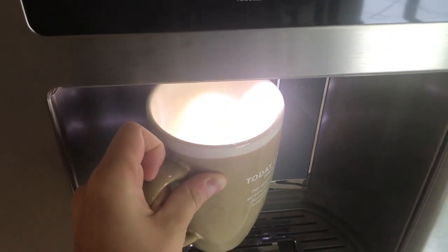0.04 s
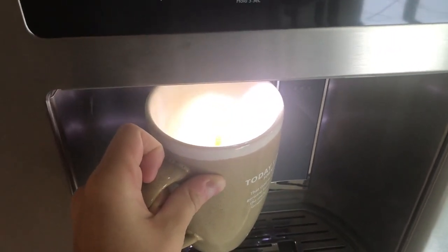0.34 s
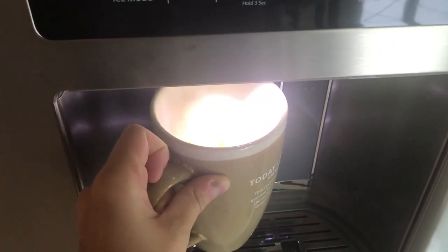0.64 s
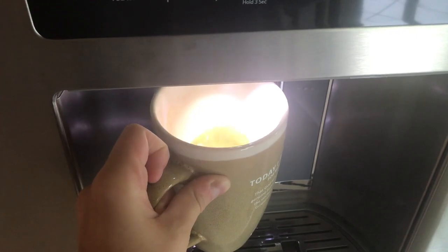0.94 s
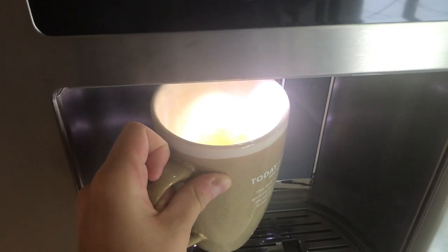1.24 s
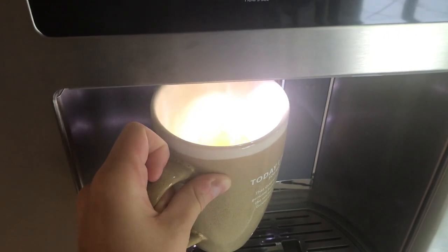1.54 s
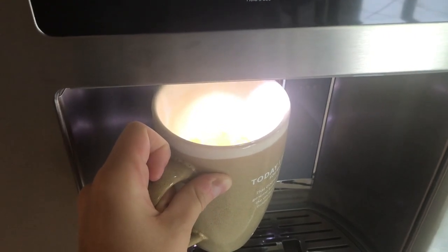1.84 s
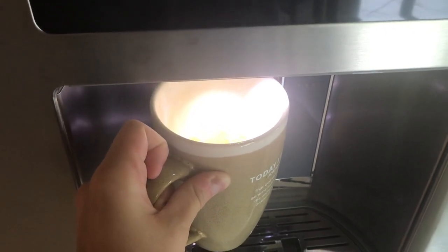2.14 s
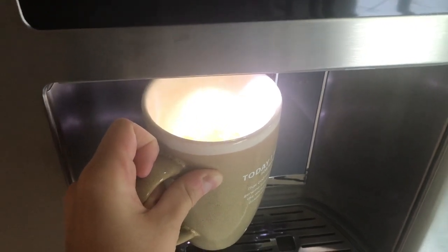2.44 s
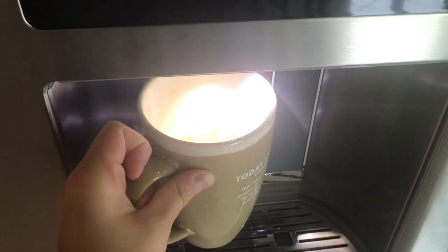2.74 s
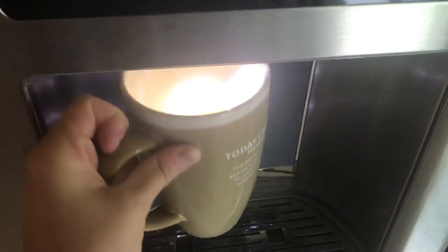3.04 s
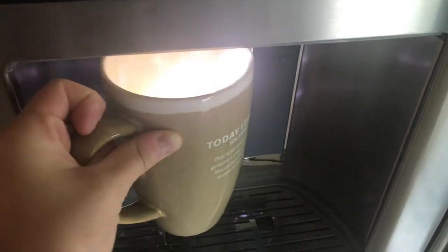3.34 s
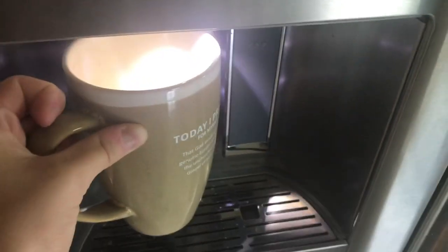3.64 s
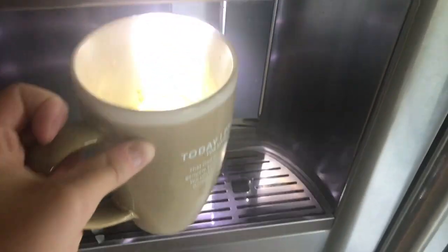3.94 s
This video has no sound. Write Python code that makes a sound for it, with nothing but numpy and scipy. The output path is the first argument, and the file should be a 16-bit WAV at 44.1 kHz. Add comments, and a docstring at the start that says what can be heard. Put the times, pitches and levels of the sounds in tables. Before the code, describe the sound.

Ice cracks and clatters in uneven bursts as a fridge dispenser crushes it over a humming, grinding motor. The motor then stops and the last chips clink into a ceramic mug, heard close by in a quiet kitchen.

```python
"""Ice crunches and clatters over a humming motor: a fridge dispenser fills a mug, close by in a kitchen.
The geared motor churns the ice bin. Cubes crack between the blades and jolt the housing,
and the chips rattle down a plastic chute that adds its own hollow tones.
After three seconds the motor runs down and the last chips tick into the mug; a few make it ring."""
import sys
import numpy as np
from scipy import signal
from scipy.fft import rfft, irfft
from scipy.io import wavfile
from scipy.ndimage import uniform_filter1d

SR = 44100
rng = np.random.default_rng(int(sys.argv[2]) if len(sys.argv) > 2 else 0)


def to_wav(s):
    """Save 16-bit WAV."""
    ch = np.atleast_2d(s).T  # columns
    pcm = np.round(np.clip(ch, -1, 1) * 32767)  # PCM
    wavfile.write(sys.argv[1], SR, pcm.astype(np.int16))


N = 176400
T = np.arange(N) / SR
RING_T = T[:SR // 8]

# tone of the quiet kitchen: f/Hz, relative level/dB
KITCHEN_COLOUR = [(30, -19), (70, 1), (160, -6.5), (260, 2), (450, -8.5), (1000, -16.5), (3000, -25),
                  (15000, -34)]
# how the motor's speed changes under load: t/s, share of normal speed
MOTOR_SPEED = [(0, .992), (.2, 1), (.5, .99), (.85, .975), (1.1, .996), (1.55, 1.014), (2.2, .993),
               (2.35, 1.005), (2.9, 1.008)]
# tones of the motor and gears at normal speed: f/Hz, level/dB
GEAR_TONES = [(102, -59), (240, -52), (274, -52), (298, -49), (330, -47), (360, -44.5), (2519, -49.5)]
# tone of the feed screw churning the ice bin: f/Hz, relative level/dB
CHURN_COLOUR = [(30, -37), (65, -14), (140, -5), (260, -2.5), (370, -1.5), (510, -10.5), (700, -8),
                (830, -12.5), (1050, -4), (1470, -20), (1700, -8), (2080, -11.5), (2330, -22), (2580, -10),
                (2900, -22), (3300, -18), (4500, -30), (6500, -23.5), (8000, -31.5), (15000, -32.5)]
# notes the housing rings at: f/Hz, relative level/dB, t60/s (the time to fade by 60 dB)
HOUSING_MODES = [(148, 1.5, 0.15), (334, 17.5, 0.04), (370, 21.5, 0.047), (410, 13, 0.059)]
# a blade bites a whole cube and jolts the housing: t/s, length/s, level/dB
JOLTS = [(0.548, 0.035, -22.5), (0.879, 0.02, -29.5), (1.347, 0.019, -33), (1.754, 0.031, -33.5),
         (2.512, 0.022, -28.5), (2.601, 0.018, -25.5), (3.019, 0.016, -35), (3.15, 0.018, -37),
         (3.316, 0.0074, -49)]
# notes the mug rings at: f/Hz, relative level/dB, t60/s
MUG_MODES = [(1080, -5, .09), (4231, -8, .14), (5771, -6, .14), (6121, -7, .13), (9623, -8, .12),
             (11320, -4, .12), (12557, -9, .14)]
# a chip hits the wall of the mug: t/s, level/dB
CLINKS = [(3.356, -59), (3.512, -39.5), (3.583, -48)]
# pitches the plastic chute brings out: f/Hz, width/Hz, level/dB relative to the plain sound
CHUTE_RESONANCES = [(971, 53, -2.5), (1126, 16, -8.5), (1790, 35, -2), (2097, 62, 5.5), (2457, 100, -1),
                    (3440, 88, -0.5), (4215, 180, -5), (5350, 98, -10.5), (6010, 170, -3)]
# larger pieces of ice that ring with a clear pitch: t/s, f/Hz, level/dB
PINGS = [(.0999, 2410, -18), (0.66, 950, -16), (0.883, 2080, -15), (1.001, 760, -19.5),
         (1.617, 5300, -16.5), (1.764, 4070, -16), (1.809, 2114, -16.5), (1.825, 970, -18),
         (1.929, 710, -14), (1.978, 1790, -20.5), (2.014, 1040, -17), (2.438, 2090, -18), (2.706, 940, -19),
         (2.839, 3950, -25.5), (3.015, 745, -14), (3.318, 1070, -33)]
# how the stream of fine crumbs swells and fades: t/s, level/dB before the chute
CRUMB_FLOW = [(0, -31), (.2, -57), (.46, -44), (.54, -35), (.68, -28), (.86, -31), (.93, -35.5), (1.1, -45),
              (1.33, -51), (1.48, -49), (1.68, -35.5), (1.92, -38.5), (2.32, -56.5), (2.55, -41.5),
              (2.8, -33), (2.93, -51), (3.45, -51), (3.7, -76.5)]
# tone of the crumbs: f/Hz, relative level/dB
CRUMB_COLOUR = [(50, -37.5), (300, -10.5), (700, -0.5), (1100, -5), (2200, -3.5), (4000, -5.5),
                (6300, -7.5), (7800, -8), (10500, -13.5), (15500, -8)]
# the low, middle, high and top band of a crack: lower f/Hz, upper f/Hz, t60/s
CRACK_BANDS = [(569, 1500, 0.043), (1500, 3300, 0.027), (3406, 7100, 0.025), (7460, 15300, 0.026)]
# ice cracks and chips strike: t/s, length/s, then level/dB in each band before the chute
CRACKS = [(0.061, 0.0015, -55, -26.5, -28.5, -45), (0.0795, 0.0013, -23.5, -31, -41, -28),
          (0.0987, 0.00099, -46, -18, -82, -57), (0.1205, 0.0013, -50, -23.5, -41, -43),
          (0.3195, 0.0018, -47, -28, -68, -30.5), (0.341, 0.0056, -29.5, -43.5, -55, -43),
          (0.36, 0.0078, -26.5, -36, -49, -42), (0.392, 0.015, -41, -41, -39, -36),
          (0.415, 0.0062, -24, -28, -37, -40), (0.4992, 0.0039, -22.5, -23.5, -44, -44),
          (0.5156, 0.01, -24.5, -30, -41, -38), (0.532, 0.032, -31, -33, -29, -28.5),
          (0.5466, 0.018, -26, -21, -24, -27.5), (0.604, 0.0057, -21.5, -25.5, -25.5, -29.5),
          (0.6353, 0.034, -29, -34, -37, -42), (0.672, 0.023, -46, -37, -39, -39),
          (0.719, 0.014, -30, -28, -25.5, -32), (0.744, 0.013, -32, -31, -46, -49),
          (0.754, 0.012, -34.5, -20, -18, -24.5), (0.8175, 0.0094, -36, -38, -36, -38),
          (0.837, 0.0015, -34, -26, -16.5, -33), (0.845, 0.02, -29, -34, -40, -40),
          (0.878, 0.017, -27, -23, -25, -37), (0.893, 0.0073, -30, -28, -45, -26),
          (0.941, 0.0024, -44, -24, -21.5, -26.5), (0.989, 0.006, -30, -30.5, -36, -36),
          (1.0011, 0.0068, -25.5, -26, -37.5, -42), (1.059, 0.0032, -82, -68, -49, -39.5),
          (1.357, 0.0031, -23, -20.5, -35, -32), (1.374, 0.0043, -30, -26, -27.5, -34.5),
          (1.416, 0.038, -30, -40.5, -42, -41.5), (1.477, 0.017, -23.5, -33, -34.5, -38),
          (1.528, 0.016, -32, -31.5, -40.5, -44), (1.549, 0.0066, -24.5, -25, -27.5, -26),
          (1.597, 0.0023, -34, -36.5, -29.5, -36), (1.6164, 0.0055, -34, -31, -21.5, -24.5),
          (1.634, 0.0073, -22, -29, -31, -40), (1.653, 0.0052, -27, -32, -23, -33),
          (1.675, 0.023, -29.5, -35.5, -45, -43), (1.719, 0.0033, -24, -27, -58, -69),
          (1.739, 0.0059, -23.5, -25.5, -47, -65.5), (1.751, 0.0026, -32.5, -17, -18.5, -29),
          (1.76, 0.012, -35.5, -29, -18.5, -28), (1.811, 0.0041, -22, -15.5, -21.5, -25),
          (1.845, 0.005, -44.5, -43, -28, -30.5), (1.8773, 0.013, -31, -33, -49, -60),
          (1.9, 0.0032, -19.5, -22, -23, -19.5), (1.911, 0.011, -24, -25, -29, -38),
          (1.9293, 0.0085, -28, -25.5, -25.5, -24.5), (1.9772, 0.0028, -41.5, -24, -18.5, -17.5),
          (2.014, 0.003, -20, -41, -24, -31.5), (2.202, 0.021, -32, -34.5, -34, -34.5),
          (2.371, 0.0053, -20.5, -48, -32.5, -31.5), (2.438, 0.01, -24, -26.5, -30.5, -31),
          (2.465, 0.015, -26.5, -32, -37, -41.5), (2.489, 0.0038, -17, -13, -22, -25),
          (2.5064, 0.0068, -19.5, -29.5, -28, -28), (2.535, 0.014, -17.5, -20.5, -23.5, -27.5),
          (2.6014, 0.011, -21.5, -19.5, -17, -22.5), (2.6218, 0.0037, -32.5, -24, -28, -36.5),
          (2.631, 0.0049, -20, -33.5, -17.5, -30.5), (2.654, 0.01, -31.5, -29, -29, -29),
          (2.7021, 0.013, -18.5, -22, -22.5, -25), (2.777, 0.025, -27.5, -37, -38, -63),
          (2.838, 0.007, -23, -39, -46, -33.5), (2.914, 0.0042, -22, -21.5, -33, -30),
          (2.981, 0.022, -50, -43, -39.5, -29), (3.014, 0.011, -26, -28.5, -30, -34),
          (3.151, 0.0093, -34, -38, -45, -55), (3.2094, 0.015, -47, -50.5, -45, -42.5),
          (3.25, 0.0052, -42.5, -44.5, -42, -46), (3.318, 0.005, -47, -48.5, -47, -44),
          (3.355, 0.003, -42, -38.5, -24.5, -22.5), (3.3696, 0.0039, -52, -49, -38, -39.5),
          (3.403, 0.0023, -66, -45.5, -39, -27.5), (3.415, 0.0044, -46, -43, -41, -37),
          (3.495, 0.0021, -47, -43.5, -36.5, -35.5), (3.513, 0.0073, -44, -46.5, -41, -30.5),
          (3.581, 0.013, -57, -59, -54.5, -46.5), (3.65, 0.0032, -49.5, -58.5, -58, -49),
          (3.7213, 0.0036, -53, -54, -53.5, -49), (3.7366, 0.0022, -45.5, -60, -52, -43.5),
          (3.765, 0.0018, -65, -72, -65, -53.5), (3.916, 0.0022, -80, -78.5, -67, -53.5)]

TOP_HZ = 15950
PIECE_T60_S = 0.03  # how long a larger piece of ice rings


def undb(db):
    """Turn decibels into a gain to multiply by."""
    return 10 ** (np.asarray(db) / 20)


def unit(x):
    """Scale a sound to an energy of 1."""
    return x / np.sqrt(np.sum(x ** 2) + 1e-18)


def level(x, db):
    """Scale a sound to an average (rms) level."""
    return unit(x) * np.sqrt(len(x)) * undb(db)


def add(out, start_s, x):
    """Mix a sound in at a given time."""
    i = max(int(start_s * SR), 0)
    out[i:i + len(x)] += x[:N - i]


def curve(points):
    """Join (time, value) points with straight lines."""
    return np.interp(T, *np.array(points).T)


def decay(t, t60):
    """A fade that loses 60 dB every t60 seconds."""
    return np.exp(-np.log(1000) * t / t60)


def band(x, lo_hz, hi_hz):
    """Keep the sound between two frequencies."""
    edges = [lo_hz, min(hi_hz, SR / 2 - 1000)]
    return signal.sosfilt(signal.butter(3, edges, btype="band", fs=SR, output="sos"), x)


def colour(x, points):
    """Shape the tone of a sound along (Hz, dB) points."""
    hz, db = np.array(points).T
    size = 2 * N
    bin_hz = np.arange(N + 1) * SR / size
    log_gain = np.log(undb(np.interp(np.log(bin_hz + 1), np.log(hz), db)))
    cepstrum = irfft(log_gain)[:N] * np.r_[1, np.full(N - 1, 2)]  # so nothing rings before its hit
    return irfft(rfft(x, size) * np.exp(rfft(cepstrum, size)))[:N]


def wander(turns_per_s):
    """A smooth random wobble with a typical size of 1."""
    hold = max(int(SR / turns_per_s), 1)
    steps = rng.standard_normal(N // 20)[np.arange(N) // hold]
    return level(uniform_filter1d(steps, hold), 0)


def ring(modes, t):
    """A struck object: one fading tone for each (Hz, dB, t60) row."""
    return sum(undb(db) * decay(t, t60) * np.sin(2 * np.pi * hz * t) for hz, db, t60 in modes)


def splinters(length_s, per_s=750, spread_db=5.5, fade_db=7):
    """The pushes of one break: a first snap, then a fading run of tiny fractures."""
    count = len(RING_T)
    hits = (rng.random(count) < per_s / SR) & (RING_T < length_s)
    pushes = hits * undb(spread_db * rng.standard_normal(count)) * rng.choice([-1, 1], count)
    pushes[0] = 2.6  # the first snap
    return pushes * undb(-fade_db * RING_T / max(length_s, .001))


def kitchen(noise_db=-66, whine_db=-81.5, whine_hz=8220):
    """The quiet background: a low rumble and a faint high whine."""
    rumble = level(colour(rng.standard_normal(N), KITCHEN_COLOUR), noise_db)
    return rumble + undb(whine_db) * np.sin(2 * np.pi * whine_hz * T)


def room(x, echo_db=-21, split_hz=2900):
    """The kitchen walls add a short wash of echoes, in which the treble lasts longer."""
    t = T[:SR // 2]
    low = band(rng.standard_normal(len(t)), 120, split_hz) * decay(t, t60=0.15)
    high = band(rng.standard_normal(len(t)), split_hz, TOP_HZ) * decay(t, t60=0.28)
    tail = unit((low + 0.52 * high) * np.minimum(t / 0.012, 1))
    return x + undb(echo_db) * signal.fftconvolve(x, tail)[:N]


def motor(stop_s=3.061, slowing_per_s=0.17, fade_db_per_s=109.5, shaft_hz=30.8, churn_db=-35.5):
    """Gears hum and the feed screw churns the ice; both die away when the power is cut."""
    since_stop = np.maximum(T - stop_s, 0)
    speed = curve(MOTOR_SPEED) * np.exp(-slowing_per_s * since_stop)
    travel = np.cumsum(speed) / SR  # a clock that runs at the motor's speed
    fading_tone = (617, -44 - 3.5 * T)  # Hz, dB: sings at first, then sinks into the grinding
    gears = np.zeros(N)
    for hz, db in GEAR_TONES + [fading_tone]:
        strength = np.sqrt(2) * undb(db + 2.2 * wander(18))
        phase = 2 * np.pi * (hz * travel + rng.random())
        gears += strength * np.sin(phase + .4 * wander(30))  # slack in the gears wobbles the tone
    throb_db = 1.5 * np.sin(2 * np.pi * shaft_hz * travel)  # once per turn of the shaft
    rough_db = 2.54 * wander(20) + 2 * wander(220)
    grinding = rng.standard_normal(N) * undb(throb_db + rough_db)
    churn = level(colour(grinding, CHURN_COLOUR), churn_db)
    return (gears + churn) * undb(-fade_db_per_s * since_stop)


def jolts():
    """The housing shudders when a blade bites a whole cube."""
    out = np.zeros(N)
    housing = band(ring(HOUSING_MODES, RING_T), lo_hz=111, hi_hz=1000)
    for start_s, length_s, db in JOLTS:
        shudder = unit(signal.fftconvolve(splinters(length_s), housing))
        add(out, start_s, shudder * np.sqrt(length_s * SR) * undb(db))
    return out


def mug(shimmer_db=-12, shimmer_t60_s=.13):
    """Chips clink on the ceramic mug: one hollow note and a few clear high ones among many weak ones."""
    out, t = np.zeros(N), T[:SR // 2]
    shimmer = [(hz, shimmer_db, shimmer_t60_s) for hz in rng.uniform(3300, TOP_HZ, size=80)]
    clink = ring(MUG_MODES + shimmer, t) * np.minimum(t / .001, 1)
    for start_s, db in CLINKS:
        add(out, start_s, undb(db) * clink)
    return out


def chute(ice, gain_db=-2.36):
    """The plastic chute rings along with the ice passing through it."""
    ringing = sum(undb(db) * signal.lfilter(*signal.iirpeak(hz, hz / width, fs=SR), ice)
                  for hz, width, db in CHUTE_RESONANCES)
    return (ice + ringing) * undb(gain_db)


def pings():
    """Larger pieces of ice each ring with one short, clear note."""
    out = np.zeros(N)
    for start_s, hz, db in PINGS:
        add(out, start_s, ring([(hz, db, PIECE_T60_S)], RING_T))
    return band(out, 300, TOP_HZ)


def tumble(knocks_per_s=220, lo_hz=643, hi_hz=1300, relative_db=-4):
    """Pieces jostle with hollow knocks, growing louder and softer with the stream of crumbs."""
    out = np.zeros(N)
    for when, pitch, size in rng.random((int(knocks_per_s * N / SR), 3)):
        hz = lo_hz * (hi_hz / lo_hz) ** pitch
        add(out, when * N / SR, size * ring([(hz, 0, PIECE_T60_S)], RING_T))
    return level(out, relative_db) * undb(curve(CRUMB_FLOW))


def crumbs(per_s=330, spread_db=7, lo_hz=700):
    """A stream of small chips ticks down, each with its own size, pitch and brightness."""
    out, t = np.zeros(N), T[:SR // 70]
    chances = N // 50
    when, luck, pitch = rng.random((chances, 3)).T
    size, brightness = rng.standard_normal((chances, 2)).T
    noise = rng.standard_normal((chances, len(t)))
    falls = luck < per_s * N / SR / chances
    for i in np.flatnonzero(falls):
        hz = lo_hz + pitch[i] * (TOP_HZ - lo_hz)
        tick = (noise[i] + np.sin(2 * np.pi * hz * t)) * decay(t, t60=0.014)
        dull = signal.lfilter([.4], [1, -.6], tick)
        treble = (tick - dull) * np.exp(0.52 * min(brightness[i], 1))
        add(out, when[i] * N / SR, (dull + treble) * undb(spread_db * min(size[i], 1.7)))
    return level(colour(out, CRUMB_COLOUR), 0) * undb(curve(CRUMB_FLOW))


def shard(lo_hz, hi_hz, t, longest_t60_s=0.067):
    """A broken piece rings at two random pitches; high ones die sooner."""
    pitches = lo_hz * (hi_hz / lo_hz) ** rng.random(2)
    knee_hz = CRACK_BANDS[0][1]
    modes = [(hz, 0, longest_t60_s * np.sqrt(knee_hz / max(hz, knee_hz))) for hz in pitches]
    return unit(ring(modes, t))


def cracks(shard_share=0.38, snap_share=0.25):
    """Cubes break between the blades: each fracture sets off a snap, a noisy burst and a ringing shard."""
    out, t = np.zeros(N), T[:SR // 25]
    breaks = [splinters(length_s)[:len(t)] for _, length_s, *_ in CRACKS]
    for k, (lo_hz, hi_hz, t60) in enumerate(CRACK_BANDS):
        snap = unit(band(1. * (t == 0), lo_hz, hi_hz))  # the bare contact, before anything rings
        bursts = band(rng.standard_normal((len(CRACKS), len(t))) * decay(t, t60), lo_hz, hi_hz)
        for (start_s, length_s, *band_db), pushes, burst in zip(CRACKS, breaks, bursts):
            fracture = unit(burst) + shard_share * shard(lo_hz, hi_hz, t) + snap_share * snap
            crack = unit(signal.fftconvolve(pushes, fracture))
            add(out, start_s, crack * np.sqrt(length_s * SR) * undb(band_db[k]))
    return out


def scene():
    """Ice, housing and mug echo in the room, over the motor and the quiet kitchen."""
    background = kitchen()
    ice = chute(cracks() + crumbs() + tumble())
    clatter = room(ice + pings() + jolts() + mug())
    return (clatter + motor() + background)[None]


def record(dry, ceiling=0.42, bottom_hz=35):
    """The microphone rounds the tallest peaks and cuts the deep bass and the highest treble."""
    rounded = ceiling * np.tanh(dry / ceiling)
    treble_cut = signal.ellip(10, .2, 80, TOP_HZ, fs=SR, output="sos")
    return signal.sosfilt(treble_cut, band(rounded, bottom_hz, SR / 2))


dry = scene()
out = record(dry)
to_wav(out)
```